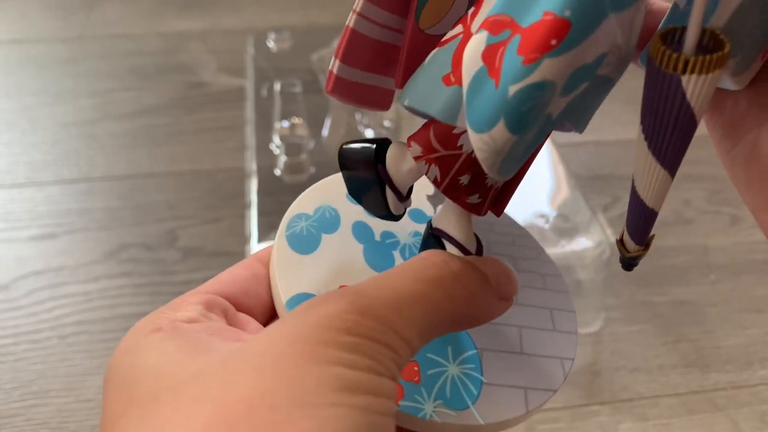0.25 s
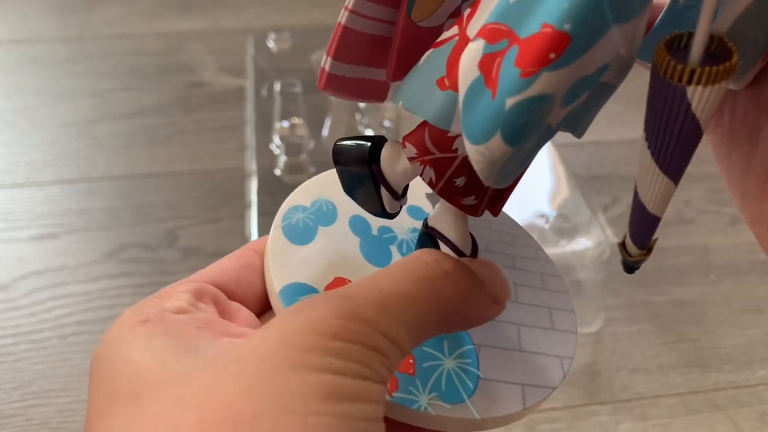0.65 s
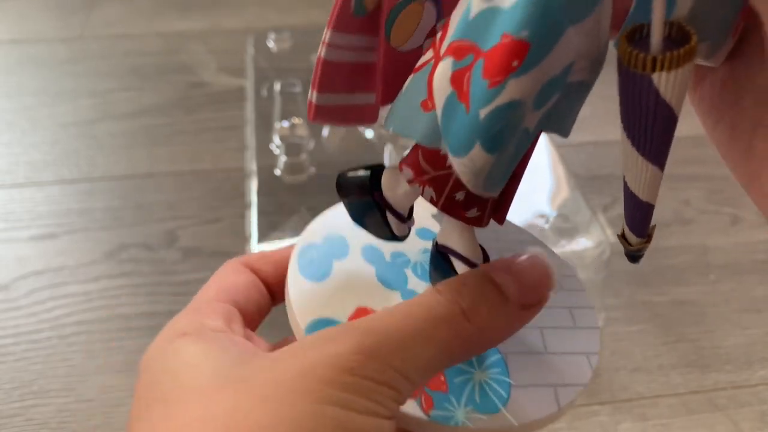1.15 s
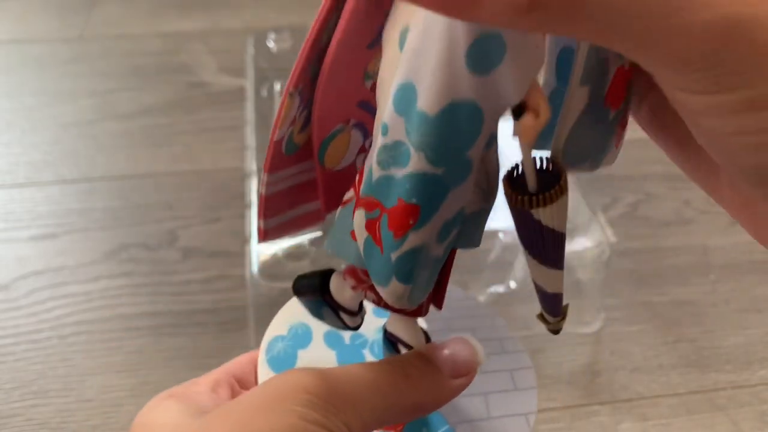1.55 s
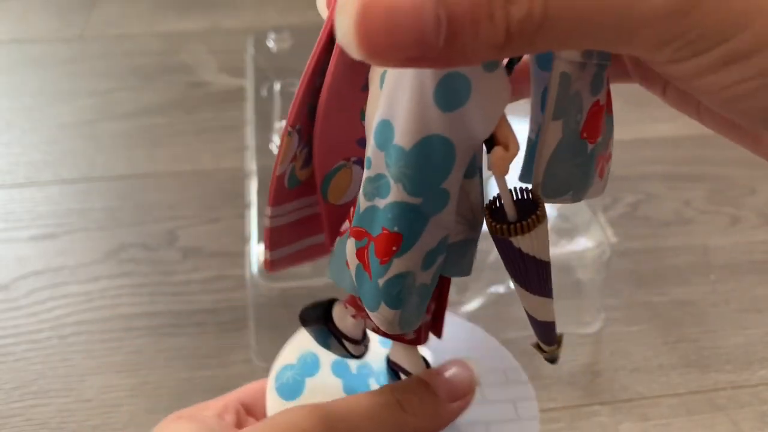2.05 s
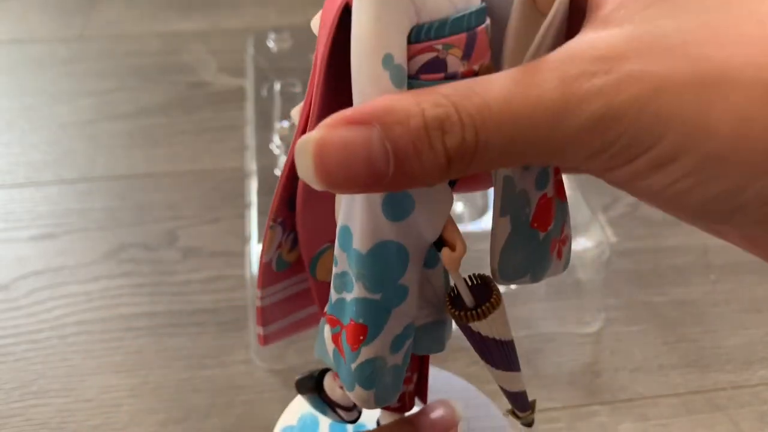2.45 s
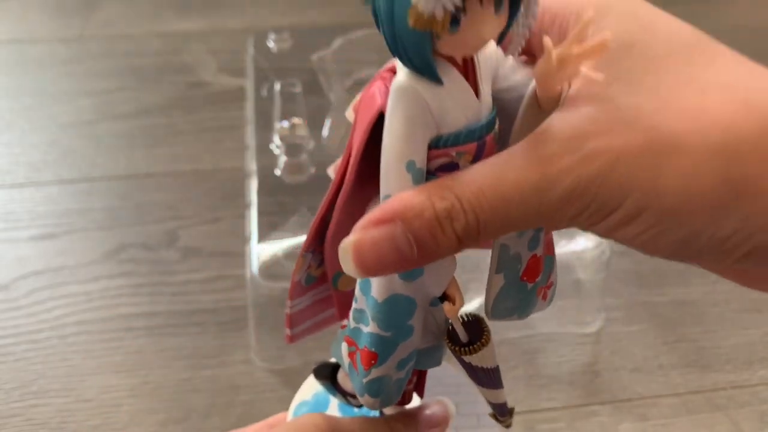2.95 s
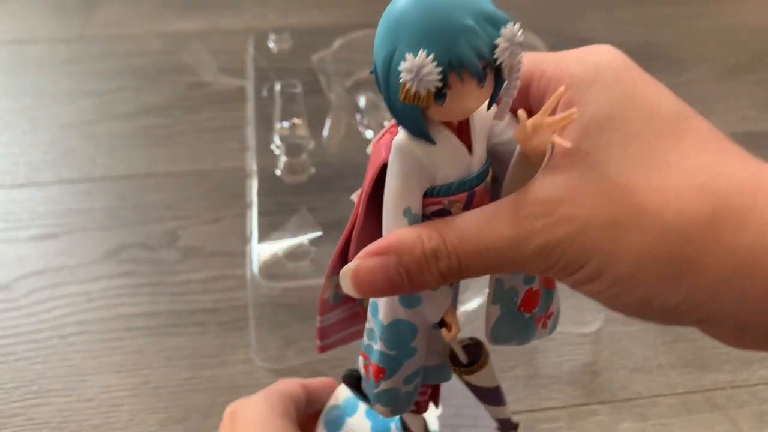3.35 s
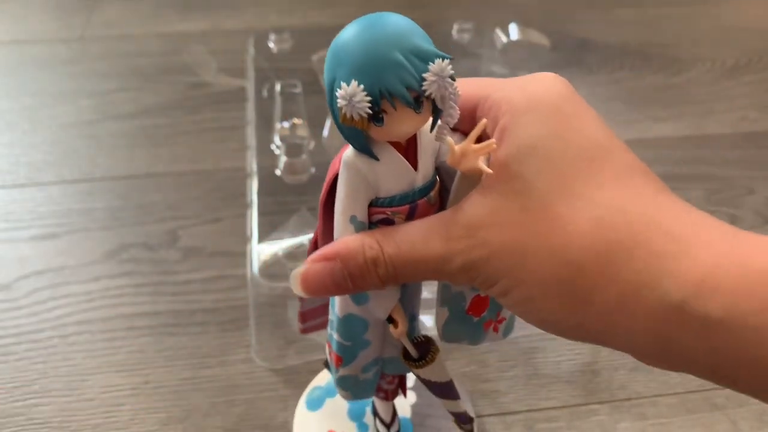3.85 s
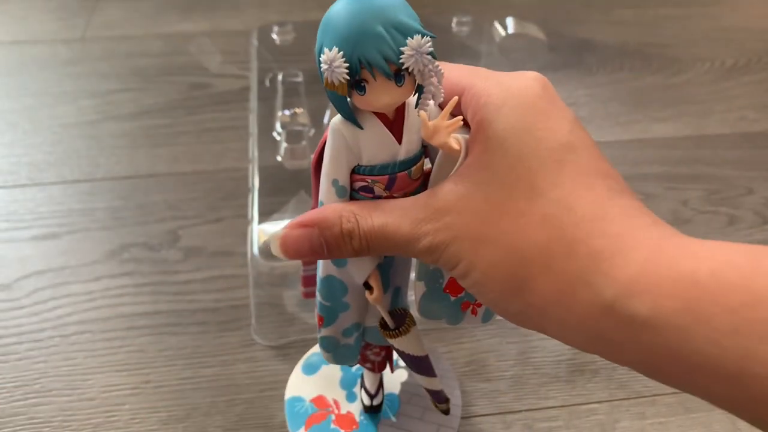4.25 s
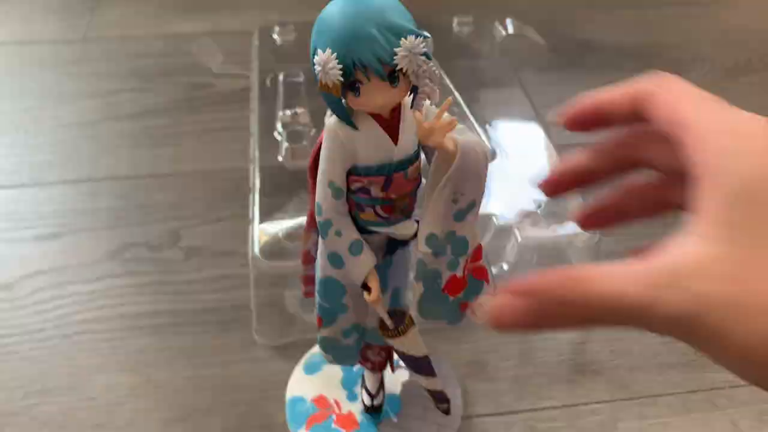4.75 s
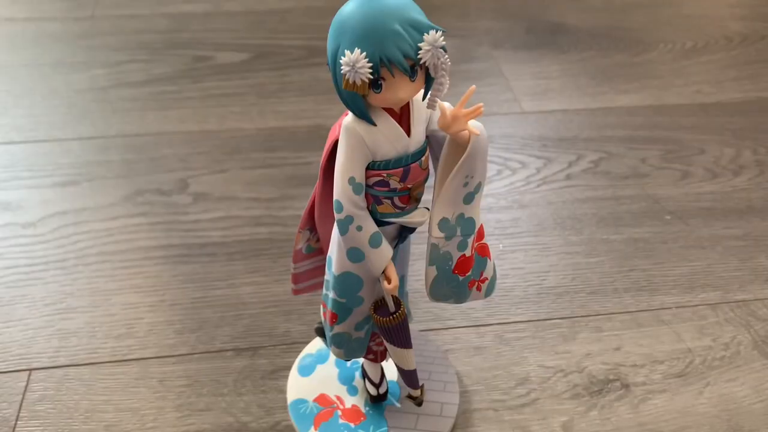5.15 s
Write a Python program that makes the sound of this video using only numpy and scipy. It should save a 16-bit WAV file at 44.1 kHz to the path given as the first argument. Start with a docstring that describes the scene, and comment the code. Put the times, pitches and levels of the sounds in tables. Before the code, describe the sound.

Light plastic ticks and fingertip squeaks, one loud clack, then a base landing and juddering on a hard floor in a quiet room.

```python
"""A small room with a laminate floor: a plastic figure is turned in the hands, stood down and nudged into place.
Joints, nails and base click and knock as noise cracks over decaying shell and base modes.
Fingertips squeak and the round base scuffs as random slips fed through resonances.
A short echo and one far snap give the room; an engine outside revs up twice and falls back,
a drone of sines through the walls, over rumble and still air made of coloured noise."""
import sys
import numpy as np
from scipy import signal
from scipy.fft import rfft, irfft, next_fast_len
from scipy.io import wavfile
from scipy.ndimage import uniform_filter1d

SR = 44100
rng = np.random.default_rng(int(sys.argv[2]) if len(sys.argv) > 2 else 0)


def generate_wav(signal):
    """Clip the signal to [-1, 1] and save it as 16-bit WAV at the path in sys.argv[1]."""
    frames = np.transpose(np.atleast_2d(signal))
    scaled = np.clip(frames, -1, 1) * 32767
    pcm = np.round(scaled).astype(np.int16)
    wavfile.write(sys.argv[1], SR, pcm)


N = 237977
TIME = np.arange(N) / SR   # seconds
BLOW_TIME = TIME[:4096]   # seconds since a contact


# Hard knocks that wake the hollow of the body and the base too. Each row: start in seconds, ring in Hz,
# ring level in dB, hollow in Hz, hollow level in dB, snap level in dB, thump level in dB, ring T60 in seconds.
KNOCKS = [(0.6188, 2100, -30, 1720, -38, -44, -35, 0.0022),
          (0.64, 1890, -37.5, 1540, -43.5, -47.5, -33.5, 0.0055),
          (2.7566, 2140, -8, 1465, -10, -12, -20.5, 0.0054),
          (3.0926, 2130, -20, 1610, -28, -32, -39.5, 0.0073),
          (4.1662, 2145, -31, 1470, -31.5, -31.5, -29.5, 0.029)]
# Dull bumps of the hand, and of the base as it catches on the boards. Each row: start in seconds,
# thump level in dB, edge ring in Hz, edge level in dB, snap level in dB.
BUMPS = [(3.797, -49, 855, -37, -60), (3.947, -42, 1252, -40, -47.5), (3.961, -24, 1240, -35, -63),
         (3.9751, -25, 970, -36, -49), (3.992, -26.5, 970, -45, -57), (4.003, -39, 660, -36, -59),
         (4.014, -48, 1340, -41, -44), (4.074, -31, 885, -46, -57), (4.106, -34, 1530, -40, -48),
         (4.118, -36, 634, -28.5, -48), (4.1697, -21.5, 1110, -36, -56), (4.185, -27, 1110, -53, -58),
         (4.228, -30, 340.8, -40, -63), (4.246, -44, 483, -44, -69), (4.281, -51, 594, -43.5, -73),
         (4.9939, -42.5, 1413, -54, -63), (5.008, -34.5, 1084, -53.5, -70)]


def knocks(hollow_t60_s=0.0075, left_db=2.5, hollow_left_db=7, edge_t60_s=0.035, edge_swell_s=0.00021):
    """Hard contacts crack sharply and wake the hollow of the body and the base; soft ones mostly the base."""
    out = silence()
    for start, hz, ring_db, hollow_hz, hollow_db, snap_db, thump_db, t60 in KNOCKS:
        shell = from_db(ring_db) * pan(left_db) * ring(hz, t60, 1.22)
        hollow = from_db(hollow_db) * pan(hollow_left_db) * ring(hollow_hz, hollow_t60_s, 1.0)
        crack = snap(crack_db=-2, crack_t60_s=.0095, modes_db=-8, press_s=.0002, side_db=4.5)
        add(out, start, shell - hollow + from_db(snap_db) * crack + from_db(thump_db) * thump())
    for start, thump_db, edge_hz, edge_db, snap_db in BUMPS:
        edge = from_db(edge_db) * ring(edge_hz, edge_t60_s, 1.0, edge_swell_s)
        add(out, start, from_db(thump_db) * thump() + edge + from_db(snap_db) * snap())
    return out


# The moment the rim of the base meets the floor: start in seconds, level in dB.
LANDING = (3.6922, -21)
# Modes of the rim ringing freely. Each row: frequency in Hz, level in dB, T60 in seconds.
RIM = [(1251, -6.5, 0.019), (2121, 4, 0.011), (2326, -0.5, 0.013), (2720, -15, 0.016), (3910, -8.5, 0.012),
       (5520, -17, 0.013), (6510, -17, 0.016), (7900, -19, .012)]


def landing(swell_s=0.00091, left_db=2.0, lead=1.88, snap_db=-19):
    """The rim touches down and rings in a few separate modes."""
    out = silence()
    start, level_db = LANDING
    modes = sum((-1) ** k * from_db(db) * ring(hz, t60, lead, swell_s) for k, (hz, db, t60) in enumerate(RIM))
    add(out, start, from_db(level_db) * (pan(left_db) * modes + from_db(snap_db) * snap()))
    return out


# Light clicks of joints and nails; the last two rows are bright crackles within the closing rustle. Each row:
# start in seconds, ring in Hz, ring level in dB, snap level in dB.
CLICKS = [(.2667, 1970, -54.5, -53), (.3062, 1800, -56, -57.5), (0.3555, 1710, -48, -61),
          (0.6253, 2220, -43, -48.5), (0.7558, 1910, -52.5, -57.5), (1.086, 2030, -42.5, -50),
          (1.253, 2210, -66, -61), (1.2660, 2060, -50, -68), (1.487, 2221, -47.5, -52),
          (1.495, 2110, -48, -60), (1.5076, 2030, -47, -53), (1.515, 2210, -43, -58),
          (1.551, 2220, -53, -70), (2.044, 1550, -61.5, -59), (2.1056, 2212, -41, -51.5),
          (2.4665, 1848, -41, -58), (2.5152, 2047, -52.5, -77.5), (2.586, 1760, -39, -65),
          (2.622, 1585, -46.5, -77), (2.66, 1467, -42, -69.5), (2.7515, 1500, -27.5, -36),
          (2.755, 2202, -31, -24), (2.7682, 1765, -31, -40.5), (2.9135, 2000, -62, -64),
          (2.9339, 2150, -56, -57.5), (3.1768, 2360, -27.5, -48), (3.742, 1500, -22, -65),
          (4.6437, 10480, -48.5, -70), (4.7324, 3593, -56, -68), (5.3266, 8770, -30.5, -52),
          (5.332, 4700, -42.5, -55)]
# The shell rings longest near its main resonance.
SHELL_HZ, SHELL_WIDTH_HZ, SHELL_T60_S, DAMPED_T60_S = 2060, 150, .018, .0065


def clicks(ring_left_db=5, snap_left_db=0.0, slip_s=0.0023, slip_db=-7, swell_s=0.0012):
    """Ticks ring the hollow shell at a pitch set by the place touched; the nail slips and catches twice more."""
    out = silence()
    for start, hz, ring_db, snap_db in CLICKS:
        nearness = np.exp(-((hz - SHELL_HZ) / SHELL_WIDTH_HZ) ** 2)
        t60 = DAMPED_T60_S + (SHELL_T60_S - DAMPED_T60_S) * nearness
        add(out, start, from_db(ring_db) * pan(ring_left_db) * ring(hz, t60, 1.0, swell_s))
        catches = slip_s * np.array([0, rng.uniform(0.86, 1), rng.uniform(1, 1.1)])
        for k, late in enumerate(catches):   # each catch is weaker
            add(out, start + late, from_db(snap_db + k * slip_db) * pan(snap_left_db) * snap())
    return out


# Bright little jerks of a joint just before the loudest clack.
# Each row: start in seconds, level in dB before a doubling of the amplitude.
CREAKS = [(2.6965, -41.5), (2.7065, -48.5), (2.7261, -46), (2.733, -41), (2.735, -39), (2.7468, -39.5)]
# Colour of the creak. Each row: frequency in Hz, density in dB per Hz.
CREAK_COLOUR = [(1500, -22.5), (3000, -9), (4000, -8.5), (5500, -16), (7200, -2.5), (8500, -5), (9800, 5),
                (11500, -8), (14000, -11)]


def creaks(t60_s=0.0097, press_s=0.00023, side_db=3):
    """Each jerk of the joint is a short, high crackle with no ring."""
    out = silence()
    for start, db in CREAKS:
        shape = (1 - np.exp(-BLOW_TIME / press_s)) * from_db(db - 60 * BLOW_TIME / t60_s)
        add(out, start, 2 * shape * widen(diffuse(CREAK_COLOUR, size=len(BLOW_TIME)), side_db))
    return out


# Colour of a contact's crack. Each row: frequency in Hz, density in dB per Hz.
CRACK_COLOUR = [(700, -26), (1500, -2), (2800, -14), (4000, -1.5), (6500, -0.5), (8000, -3), (10000, -1.5),
                (12000, -8), (14000, -7.5)]
# Shell modes above the main ring. Each row: frequency in Hz, level in dB, T60 in seconds,
# the first two before a random spread at every strike.
SHELL = [(2770, -9, 0.0046), (3240, -12, .0045), (3357, -6.5, 0.011), (4060, -6.5, 0.008),
         (4480, -4, 0.0059), (5200, -8.5, 0.0018), (5800, -14.5, 0.0028), (6900, -7.5, 0.014),
         (10100, -2, .004), (10800, -8, 0.0041), (12800, -10, 0.0051)]
STRIKE_SPREAD_DB, SHELL_DETUNE = 2.5, .025   # random spread of level, and of pitch as a share


def snap(crack_db=-2, crack_t60_s=0.015, modes_db=-2.0, press_s=0.00045, side_db=1.5):
    """The bright part of a contact: a brief crack and the upper shell modes, struck differently each time."""
    noise = widen(diffuse(CRACK_COLOUR, size=len(BLOW_TIME)), side_db)
    crack = noise * from_db(-60 * BLOW_TIME / crack_t60_s)
    modes = 0
    for hz, db, t60 in SHELL:
        strike = from_db(db + rng.normal(0, STRIKE_SPREAD_DB)) * rng.choice([-1, 1])
        struck_hz = hz * (1 + SHELL_DETUNE * rng.normal())
        modes = modes + strike * ring(struck_hz, t60, rng.uniform(0.34, 3.5))
    give = 1 - np.exp(-BLOW_TIME / press_s)   # the plastic gives a little
    return give * (from_db(crack_db) * crack + from_db(modes_db) * modes)


# Modes of the base against the boards. Each row: frequency in Hz, level in dB, T60 in seconds.
BASE = [(166, 1.5, 0.021), (305, -7, 0.031), (473, 1, 0.012), (664, -3, 0.0085), (720, 2, 0.0057),
        (920, -9.5, 0.007)]


def thump():
    """The low modes of the base, quickly damped."""
    return sum((-1) ** k * from_db(db) * ring(hz, t60, 1.0) for k, (hz, db, t60) in enumerate(BASE))


# Pushes of the base over the floor in uneven jerks.
# Each row: start in seconds, length in seconds, judder level in dB, grit level in dB.
SLIDES = [(3.455, 0.031, -55, -71), (3.51, 0.067, -64, -100), (3.72, 0.047, -64.5, -57),
          (3.797, 0.044, -57, -59.5), (3.88, .025, -66, -57), (3.911, 0.012, -58, -50.5),
          (3.925, .02, -41, -49), (3.953, 0.013, -36.5, -45), (3.978, 0.017, -36, -43.5),
          (4.003, 0.023, -35.5, -46.5), (4.04, .02, -45, -60), (4.074, 0.017, -44.5, -52),
          (4.094, .014, -36.5, -46.5), (4.113, 0.017, -38, -43.5), (4.145, 0.016, -35.5, -47),
          (4.174, 0.0095, -37.5, -42), (4.2, 0.023, -43, -56), (4.25, 0.038, -46.5, -65.5)]
# Low resonances of the base as it judders. Each row: frequency in Hz, width in Hz, level in dB.
JUDDER = [(167, 22, 5.5), (292, 51, -0.5), (372, 49, .5), (481, 57, -0.5), (534, 38, -0.5), (652, 72, 0.5),
          (750, 80, -4), (964, 22, -0.5)]
# Bright resonances of the gritty scrape. Each row: frequency in Hz, width in Hz, level in dB.
GRIT = [(1250, 57, 5.5), (1090, 560, -1.5), (1570, 170, 1), (1795, 74, -0.5), (2090, 247, -2.5),
        (2820, 530, -16.5), (3690, 550, -15), (6840, 2100, -24.5), (9940, 790, -20), (13500, 1100, -25)]
# How the resonances of the base move. Each row: time in seconds, frequency ratio.
BASE_BEND = [(3.7, 1), (3.91, 1.08), (3.96, 1.014), (4.02, 1.024), (4.09, .94), (4.17, 1.005), (4.28, 0.89)]


def sliding(judder_top_hz=1250, patchy_db=2, grit_patchy_db=3.5):
    """The rim catches on the grain of the boards hundreds of times a second; resonances move with the weight."""
    # the base gathers speed, slows over the push and stops
    judder, grit = strokes(SLIDES, attack_s=0.017, release_s=0.012, ease_db=6.5)
    bend, = in_time(BASE_BEND)
    slips = from_db(patchy_db * wander(step_s=.006)) * grains(per_s=650, spread_db=0.7)
    lowpass = signal.butter(4, judder_top_hz, fs=SR, output="sos")
    low = rms_one(signal.sosfilt(lowpass, resonate(slips, JUDDER)))
    fine_slips = from_db(grit_patchy_db * wander(step_s=.004)) * grains(per_s=700, spread_db=0.0)
    high = resonate(slips + fine_slips, GRIT)
    low_pair = left_first(bent(low, bend), lag_s=0.00015)
    high_pair = left_first(bent(high, bend), lag_s=.00004) * pan(1.8)
    return judder * low_pair + grit * high_pair


# Fingertip rubs. Each row: start in seconds, length in seconds, shell ring level in dB,
# skin hiss level in dB, pitch of the ring in Hz before a small waver.
RUBS = [(1.01, 0.012, -87, -70.5, 2044), (1.083, 0.0046, -66, -68, 1997), (1.134, 0.0069, -71, -62, 2040),
        (1.497, 0.02, -71, -63, 2192), (1.534, 0.023, -82, -64.5, 2187), (1.79, 0.048, -81, -75, 2197),
        (2.096, 0.01, -68, -62, 2315), (2.932, 0.0095, -63, -67, 2130), (3.013, 0.05, -67.5, -64, 1995),
        (3.105, 0.0043, -60, -59, 1950), (3.124, 0.011, -57.5, -60, 2128), (3.169, 0.0082, -60, -61, 2245),
        (3.221, 0.014, -68, -65, 2175), (3.253, 0.0045, -60, -66, 2137), (3.268, 0.012, -59.5, -56.5, 2080),
        (3.293, .024, -56, -60.5, 2180), (3.331, .004, -64.5, -65, 2180), (3.356, 0.0079, -67, -63, 2134),
        (3.382, 0.024, -70, -67, 2120), (3.445, .016, -84, -66.5, 2100), (3.713, 0.047, -54, -60, 1947),
        (3.793, .014, -56, -63, 2110)]
# Shell resonances under the finger, before the pitch bend. Each row: frequency in Hz, width in Hz, level in dB.
RUB_MODES = [(2172, 143, 3), (2230, 220, -1.5), (1810, 700, -10.5), (3800, 510, -20.5)]
# Colour of the skin's hiss. Each row: frequency in Hz, density in dB per Hz.
SKIN_COLOUR = [(1500, -29), (3000, 2), (4500, -5.5), (5500, -8), (7400, 4), (8700, -8), (10000, 1),
               (13500, -5), (16000, 4.5)]


def fingers(crackle=0.4, patchy_db=3, pitch_waver=0.014):
    """Skin sticks and slips on the paint: each slip rings the shell, pitched by the grip, and adds a hiss grain."""
    rubs = np.array(RUBS)
    # a finger presses on, eases over the stroke and lifts
    ringing, hissing = strokes(rubs[:, :4], attack_s=0.0077, release_s=0.014, ease_db=2.5)
    slips = from_db(patchy_db * wander(step_s=0.012)) * grains(per_s=260, spread_db=0.5)
    middles = rubs[:, 0] + rubs[:, 1] / 2
    pitch_hz = np.interp(TIME, middles, rubs[:, 4]) * (1 + pitch_waver * wander(step_s=.015))
    squeak = bent(resonate(slips, RUB_MODES), pitch_hz / RUB_MODES[0][0])
    shell = left_first(squeak, lag_s=.0001) * pan(2.5)
    grain = rms_one(signal.lfilter([1], [1, -.98], np.abs(slips)))
    hiss = diffuse(SKIN_COLOUR) * rms_one(1 + crackle * grain)
    return ringing * shell + hissing * hiss


# Chirps of a fingertip letting go. Each row: start in seconds, length in seconds,
# pitch halfway through in Hz, level in dB.
CHIRPS = [(1.1062, 0.0056, 2030, -46.5), (1.1225, 0.0076, 1952, -55), (1.139, 0.02, 2100, -63),
          (1.2125, 0.0053, 2260, -59.5), (1.2655, 0.0037, 2060, -58.5), (2.925, 0.014, 2023, -56),
          (3.105, .008, 1952, -50), (3.263, 0.011, 2070, -53), (3.27, .017, 2080, -53),
          (3.298, .008, 2150, -60), (3.3065, 0.0093, 2123, -45.5), (3.3165, 0.0069, 2180, -60),
          (3.355, 0.017, 2120, -55.5), (3.376, .014, 2105, -56)]
# Partials above the main ring. Each row: frequency ratio, level in dB.
CHIRP_PARTIALS = [(1.85, -29), (3.4, -27), (3.85, -22)]
CHIRP_FALL = .05   # share of its pitch that a chirp loses as the skin lets go


def chirps(left_db=4, lag_s=.00008, rough=0.36):
    """A fingertip lets go and sings briefly on the shell: a spindle of sound that sags in pitch."""
    out = silence()
    shake = 1 + rough * wander(step_s=.0012)
    for start, length, hz, db in CHIRPS:
        t = BLOW_TIME - np.array([[0], [lag_s]])
        progress = np.clip(t / max(length, .002), 0, 1)
        turn = 2 * np.pi * hz * t * (1 + CHIRP_FALL * (1 - progress) / 2)
        upper = sum(from_db(partial_db) * np.sin(ratio * turn) for ratio, partial_db in CHIRP_PARTIALS)
        spindle = np.sin(np.pi * progress ** 0.84) ** 2
        add(out, start, from_db(db) * spindle * (np.sin(turn) + upper))
    return pan(left_db) * out * shake


# A soft rustle close to the microphones as the hand moves away. Each row: time in seconds, level in dB.
RUSTLE_DB = [(5.1, -91), (5.19, -74.5), (5.29, -71), (5.306, -59.5), (5.37, -64.5), (5.39, -58), (5.4, -63)]
# Colour of the rustle. Each row: frequency in Hz, density in dB per Hz.
RUSTLE_COLOUR = [(1500, -12), (3200, -12.5), (4500, -6.5), (7000, -6), (8800, -5), (11000, -7),
                 (14000, -5.5), (16000, -5)]


def rustle(patchy_db=2.5, left_db=-4):
    """Cloth or skin brushes by: a bright hiss that swells."""
    level_db, = in_time(RUSTLE_DB)
    return from_db(level_db + patchy_db * wander(step_s=0.0025)) * pan(left_db) * diffuse(RUSTLE_COLOUR)


# One thin, dry tick: start in seconds, level in dB.
TICK = (4.8195, -39)


def thin_tick(t60_s=.0014, press_s=.00004):
    """A single dry tick with no ring, in the middle: one pulse that jumps up and decays."""
    out = silence()
    start, db = TICK
    pulse = (1 - np.exp(-BLOW_TIME / press_s)) * from_db(db - 60 * BLOW_TIME / t60_s)
    add(out, start, pulse * np.ones((2, 1)))
    return out


# A snap from elsewhere in the room: start in seconds, level in dB as sent to the echo.
FAR_SNAP = (1.919, -30.5)
# Colour of the distant snap. Each row: frequency in Hz, density in dB per Hz.
FAR_COLOUR = [(400, -4), (1050, 7), (1500, 1.5), (2300, 1), (2900, 0), (3500, 2), (4200, -6.5),
              (5000, -7.5), (10000, -2.5), (14000, -10.5)]


def far_snap(t60_s=0.017, swell_s=0.0013):
    """One dry, slightly drawn-out snap some way off: a swelling and decaying burst of noise."""
    out = silence()
    start, db = FAR_SNAP
    shape = (1 - np.exp(-BLOW_TIME / swell_s)) * from_db(db - 60 * BLOW_TIME / t60_s)
    add(out, start, shape * diffuse(FAR_COLOUR, size=len(BLOW_TIME)))
    return out


def floor_bounce(x, lag_s=0.0031, bounce_db=-13):
    """The hard floor close by returns each contact once."""
    return x + from_db(bounce_db) * np.array([np.interp(TIME - lag_s, TIME, side) for side in x])


# Colour of the room's echo. Each row: frequency in Hz, level in dB.
ROOM_COLOUR = [(150, -0.5), (600, -3.5), (1500, -2.5), (2900, -2), (3700, 1.2), (5000, -1), (9000, -4.5),
               (15000, -6)]


def room(x, t60_s=.255, build_s=0.0044, grain_db=2.5):
    """Reflections build up within milliseconds and die away, arriving in uneven clumps."""
    t = TIME[:SR // 2]
    clumps = from_db(grain_db * wander(step_s=.0008)[:len(t)])
    envelope = from_db(-60 * t / t60_s) * (1 - np.exp(-(t / build_s) ** 2))
    echo = clumps * diffuse(ROOM_COLOUR, size=len(t)) * envelope
    unit_echo = echo / np.sqrt(np.sum(echo ** 2) / 2)
    return signal.fftconvolve(x, unit_echo, axes=1)[:, :N]


# Engine speed, revving up twice and falling back. Each row: time in seconds, speed in cycles per second
# before smoothing.
ENGINE_SPEED = [(0, 22.17), (.5, 25.16), (.9, 25.8), (1.25, 22.95), (1.6, 23.05), (1.72, 20.6),
                (1.86, 17.8), (2.7, 21.33), (3.3, 24.5), (4.0, 27.8), (4.22, 25), (4.8, 20.1), (5.4, 15.8)]
# Loudness of the engine. Each row: time in seconds, level in dB.
ENGINE_DB = [(0, -41.5), (.8, -43), (.96, -40.5), (1.1, -47), (1.7, -44.5), (1.9, -43), (2.7, -40),
             (2.95, -44), (3.3, -40), (4.0, -42), (4.8, -48.5), (4.85, -61.5), (5.1, -56.5), (5.33, -51)]
# Exhaust orders heard: multiples of the engine speed.
ENGINE_ORDERS = (3, 4, 5, 6, 7)
# Strength of each of these orders. Each row: level when pulling in dB, level when coasting in dB.
ORDER_DB = [(-21, -0.5), (8, 6), (1.5, -3), (-18.5, -2), (-2, -1)]
# What the walls pass, with room resonances near 86 and 120 Hz. Each row: frequency in Hz, level in dB.
WALLS = [(50, -3.5), (65, -5), (75, -1), (86, 3.5), (94, -9), (103, -8.5), (120, 3.5), (133, -0.5),
         (150, -13), (190, -24)]
# Loudness of the road rumble through the walls. Each row: time in seconds, level in dB.
RUMBLE_DB = [(0, -49), (.7, -47), (1.0, -46.5), (1.3, -50.5), (1.7, -48), (2.1, -49), (3.4, -44.5),
             (4.2, -50), (4.78, -50), (4.85, -52), (5.4, -56)]
# Colour of the rumble. Each row: frequency in Hz, density in dB per Hz.
RUMBLE_COLOUR = [(20, -29), (35, -5.5), (50, -1.5), (80, 7), (130, 4.5), (170, -5), (200, 1), (230, -13),
                 (300, -11.5), (500, -56.5)]


def engine(waver_db=1.5, left_db=-2.1):
    """Low exhaust orders glide through room resonances, balanced by the throttle, with road rumble below."""
    # the flywheel evens out the speed
    speed = uniform_filter1d(in_time(ENGINE_SPEED)[0], size=SR // 10, mode="nearest")
    # the throttle is open while the speed rises
    throttle = uniform_filter1d((np.gradient(speed) > 0) * 1.0, size=SR // 7, mode="nearest")
    turn = 2 * np.pi * np.cumsum(speed) / SR
    level_db, = in_time(ENGINE_DB)
    drone = 0
    for order, (pull_db, coast_db) in zip(ENGINE_ORDERS, ORDER_DB):
        balance_db = throttle * pull_db + (1 - throttle) * coast_db
        db = level_db + balance_db + at_hz(WALLS, order * speed) + waver_db * wander(step_s=0.091)
        drone = drone + from_db(db) * np.sin(order * turn + rng.uniform(0, 2 * np.pi))
    rumble = from_db(in_time(RUMBLE_DB)[0]) * diffuse(RUMBLE_COLOUR)
    return pan(left_db) * (left_first(drone, lag_s=0.00016) + rumble)


# Still air of the room. Each row: frequency in Hz, density in dB per Hz.
AIR_COLOUR = [(140, -23.5), (200, -4.5), (300, -15.5), (450, -19.5), (680, -24), (920, -21.5), (1300, -34),
              (2000, -42.5), (3000, -48), (5000, -52.5), (8000, -58), (10000, -49.5), (13800, -60),
              (16000, -73.5)]


def still_air(level_db=-58):
    """A faint, steady bed of coloured noise."""
    return from_db(level_db) * diffuse(AIR_COLOUR)


# Likeness of the two microphones in a diffuse field. Each row: frequency in Hz, correlation.
LIKENESS = [(100, 0.94), (300, 0.88), (600, 0.013), (1200, 0.25), (2500, 0.0046), (12000, 0.02)]


def diffuse(spectrum, size=N):
    """Coloured stereo noise, alike in the bass and unrelated in the treble; rms 1."""
    padded = next_fast_len(size)
    hz = np.arange(padded // 2 + 1) * SR / padded
    mid, side = rfft(rng.standard_normal((2, padded)))
    alike = np.clip(at_hz(LIKENESS, hz), -1, 1)
    both = np.sqrt(1 + alike) * mid + np.sqrt(1 - alike) * side * [[1], [-1]]
    return rms_one(irfft(both * from_db(at_hz(spectrum, hz)), padded)[:, :size])


def ring(hz, t60, lead=0, swell_s=0):
    """A struck mode at both microphones; the left leads by a phase in radians. A soft contact lets it swell."""
    attack = (1 - np.exp(-3 * BLOW_TIME * hz)) * (1 - np.exp(-BLOW_TIME / (swell_s + 1e-9)))
    phase = lead * np.array([[.5], [-.5]])
    return attack * from_db(-60 * BLOW_TIME / t60) * np.sin(2 * np.pi * hz * BLOW_TIME + phase)


def strokes(rows, attack_s, release_s, ease_db):
    """Each stroke swells, holds while the pressure eases, and dies away; one gain curve per level column."""
    power = 0
    for start, length, *levels_db in rows:
        progress = np.clip((TIME - start) / max(length, .002), 0, 1)
        early = np.maximum(start - TIME, 0) / attack_s
        late = np.maximum(TIME - start - length, 0) / release_s
        shape = np.exp(-np.minimum(early ** 2 + late, 20)) * from_db(-ease_db * progress)
        power = power + np.outer(from_db(levels_db), shape) ** 2
    return np.sqrt(power)


def grains(per_s, spread_db):
    """Tiny slips of uneven size at random moments."""
    sizes = from_db(spread_db * np.minimum(rng.exponential(1, N), 4)) * rng.choice([-1, 1], N)
    return sizes * (rng.random(N) < per_s / SR) + 1e-18


def resonate(x, modes):
    """Parallel resonances of alternating sign; rms 1."""
    out = 0
    for k, (hz, width, db) in enumerate(modes):
        r = np.exp(-np.pi * width / SR)   # pole radius
        zeros = (1 - r * r) / 2 * np.array([1, 0, -1])
        poles = [1, -2 * r * np.cos(2 * np.pi * hz / SR), r * r]
        out = out + (-1) ** k * from_db(db) * signal.lfilter(zeros, poles, x)
    return rms_one(out)


def bent(x, ratio):
    """Moves all the resonances of a steady sound by a changing ratio, by playing it faster or slower."""
    return np.interp(np.cumsum(ratio) / SR % TIME[-1], TIME, x)


def wander(step_s):
    """A random value that glides to a new one at every step."""
    knots = np.arange(0, TIME[-1] + 1, step_s)
    return np.interp(TIME, knots, rng.standard_normal(N // 20)[:len(knots)])


def widen(x, side_db):
    """Treble from close by reaches the two microphones mostly out of step."""
    mid, side = (x[0] + x[1]) / 2, (x[0] - x[1]) / 2
    return from_db(-side_db / 2) * mid + from_db(side_db / 2) * side * [[1], [-1]]


def left_first(x, lag_s):
    """The sound reaches the right microphone a little later."""
    return np.array([x, np.interp(TIME - lag_s, TIME, x)])


def pan(left_db):
    """Gains that make the left side louder than the right by left_db."""
    return from_db([[left_db / 2], [-left_db / 2]])


def silence():
    """An empty stereo track."""
    return np.zeros((2, N))


def add(out, start, sound):
    """Mixes a short stereo sound in at a time in seconds."""
    i = round(start * SR)
    out[:, i:i + sound.shape[1]] += sound[:, :N - i]


def in_time(rows):
    """Each column of a curve at every sample."""
    seconds, *columns = np.transpose(rows)
    return [np.interp(TIME, seconds, column) for column in columns]


def at_hz(points, hz):
    """A curve read at any frequency, on a logarithmic scale."""
    points = np.array(points)
    return np.interp(np.log(hz + 1), np.log(points[:, 0]), points[:, 1])


def from_db(db):
    """Decibels to amplitude."""
    return 10 ** (np.asarray(db) / 20)


def rms_one(x):
    """Scales a sound to an rms of 1."""
    return x / np.sqrt(np.mean(x ** 2) + 1e-20)


def scene():
    """Contacts, rubs and scuffs close by, their echo, the far snap, the engine and the air."""
    hard = knocks() + landing()
    light = clicks() + creaks()
    rub = fingers() + chirps()
    slide = sliding()
    far = far_snap()
    handled = from_db(-15.0) * hard + from_db(-12.5) * light + from_db(-8.0) * rub + from_db(-5.5) * slide
    echoes = room(handled + far)
    near = floor_bounce(hard + light) + rub + slide + thin_tick() + rustle()
    far_direct = from_db(-18) * far   # the far snap is heard mostly as its echo
    return near + far_direct + echoes + engine() + still_air()


def record(dry, mic_top_hz=14450, cutoff_hz=15800):
    """The microphones roll off in the high treble and the top is cut steeply."""
    soft = signal.sosfilt(signal.butter(8, mic_top_hz, fs=SR, output="sos"), dry)
    return signal.sosfilt(signal.ellip(10, .1, 80, cutoff_hz, fs=SR, output="sos"), soft)


dry = scene()
out = record(dry)
generate_wav(out)
```